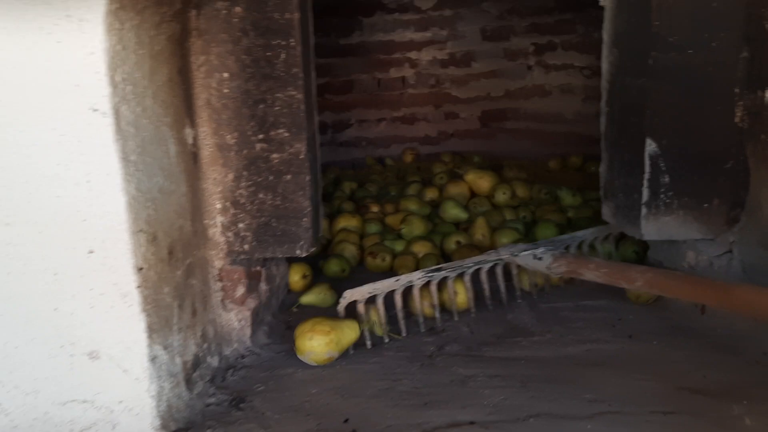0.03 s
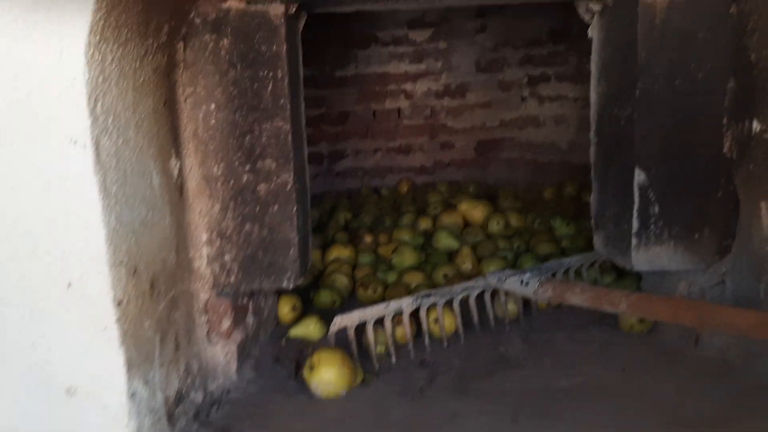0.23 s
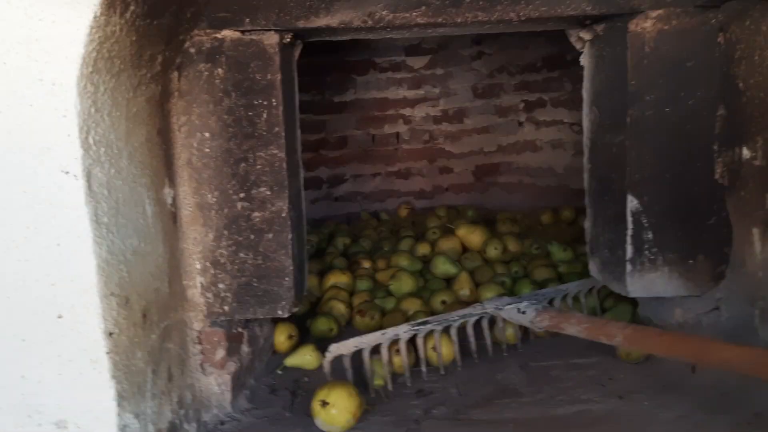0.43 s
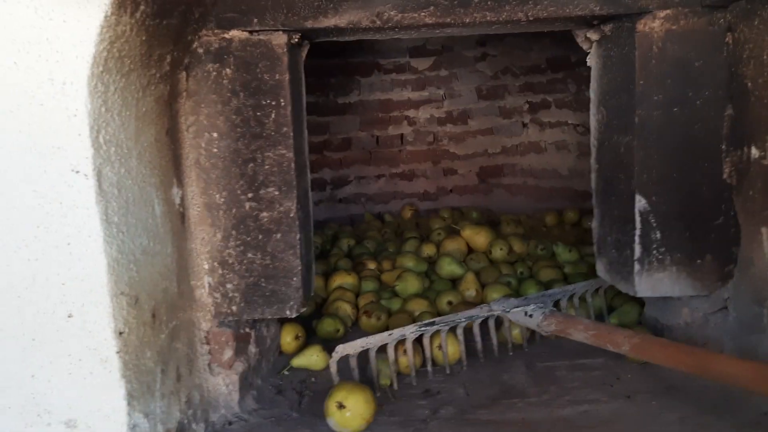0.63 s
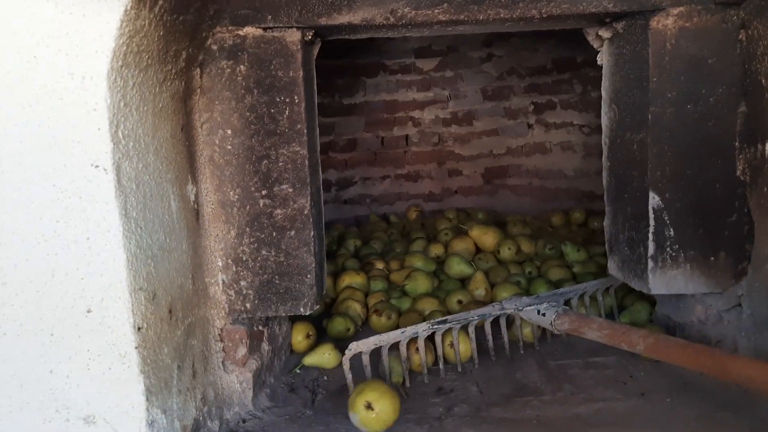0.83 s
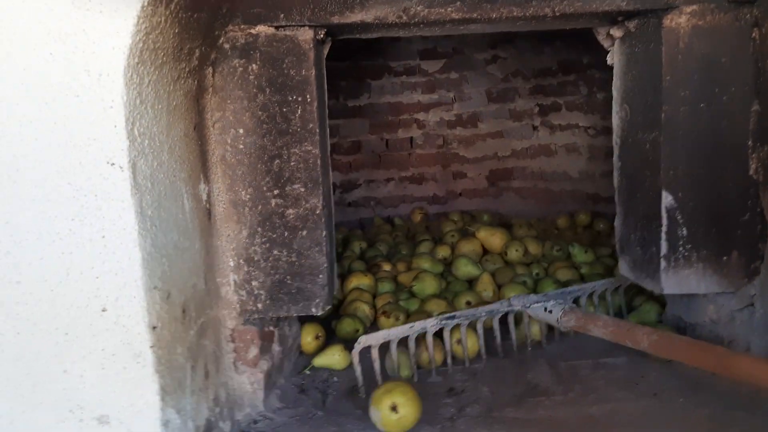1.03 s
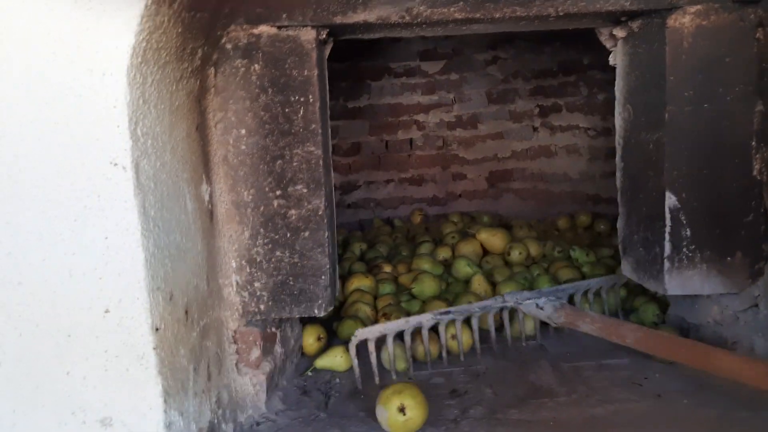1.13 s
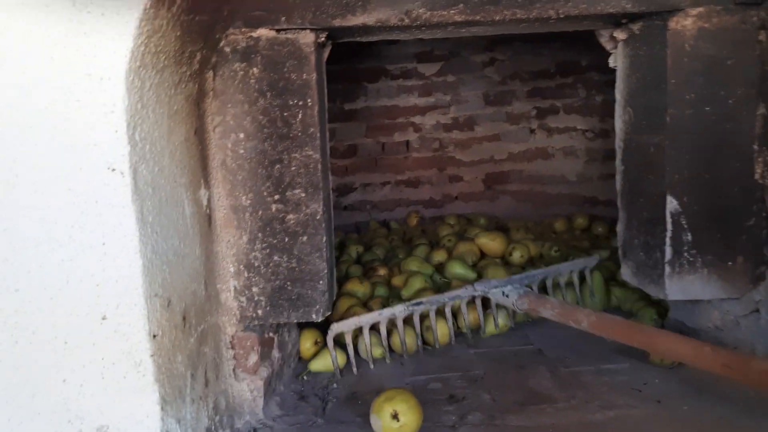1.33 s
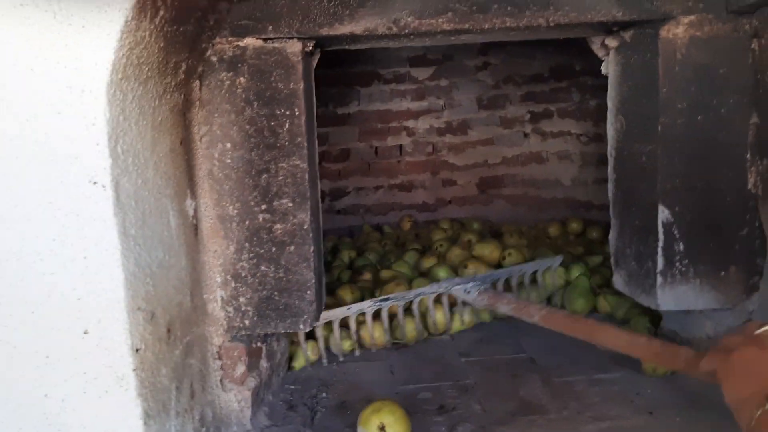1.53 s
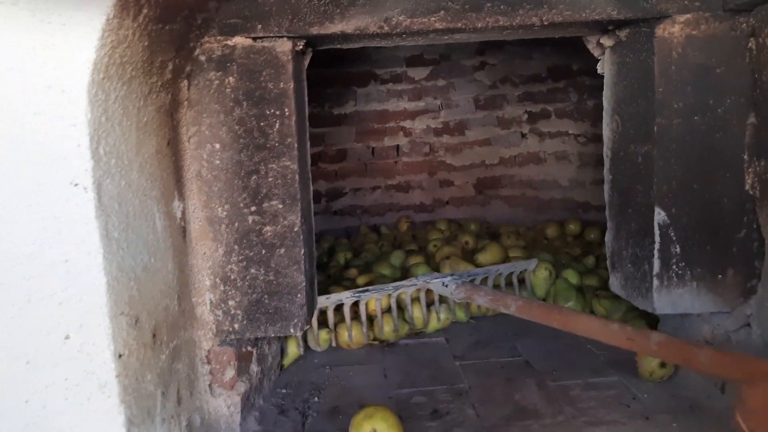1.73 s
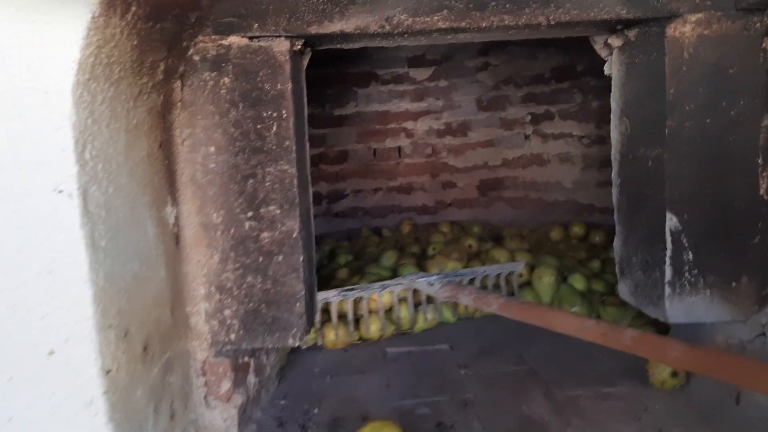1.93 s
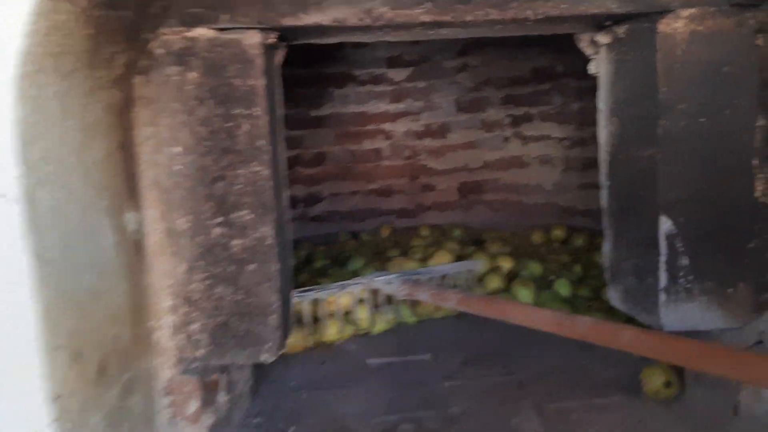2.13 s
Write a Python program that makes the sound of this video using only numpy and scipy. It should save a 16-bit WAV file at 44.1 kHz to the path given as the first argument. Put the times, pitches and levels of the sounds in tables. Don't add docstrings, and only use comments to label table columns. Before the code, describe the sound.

A metal rake scrapes a gritty brick oven floor, close in stereo with short hollow echo and faint air. From 0.07 to 0.3 s, light scrapes, soft pear bumps and bright grit snaps. It quiets until a rattling handle clack at 0.86 s. From 1.2 s a stronger push brings harsh catches, short steel rings and low pear thuds, peaking near 1.24 and 1.63 s, scraping on until an abrupt end at 2.16 s.

```python
import sys
import numpy as np
from scipy import signal
from scipy.fft import rfft, irfft, next_fast_len
from scipy.io import wavfile

SR = 44100
rng = np.random.default_rng(int(sys.argv[2]) if len(sys.argv) > 2 else 0)


def field_ratio(decibels):
    return 10 ** (np.asarray(decibels, dtype=float) / 20)


def master_out(mix):
    frames = np.transpose(np.atleast_2d(mix))
    ceiling = np.clip(frames, -1, 1)
    pcm = np.round(ceiling * 32767).astype(np.int16)
    wavfile.write(sys.argv[1], SR, pcm)


N = 95520


def rms_one(x):
    return x / np.sqrt(np.mean(x ** 2) + 1e-20)


def in_time(rows):
    s, *columns = np.transpose(rows)
    return [np.interp(np.arange(N) / SR, s, column) for column in columns]


def at_hz(points, hz):
    point_hz, value = np.array(points)[:, 0], np.array(points)[:, 1]
    return np.interp(np.log(hz), np.log(np.maximum(point_hz, 1)), value)


def bandpass(x, order, low_hz, high_hz):
    return signal.sosfilt(signal.butter(order, [low_hz, high_hz], "band", fs=SR, output="sos"), x)


def drift(rate):
    r = np.exp(-80 * np.pi * rate / SR)
    chance = rng.standard_normal(N // 40 + 2002)
    slow = signal.lfilter([1], [1, -2 * r, r * r], chance)[2000:]
    return np.interp(np.arange(N) / 40, np.arange(len(slow)), rms_one(slow))


def ring(x, hz, t60):
    r, w = field_ratio(-60 / (t60 * SR)), 2 * np.pi * hz / SR
    return signal.lfilter([0, np.sin(w)], [1, -2 * r * np.cos(w), r * r], x + 1e-18)


def grains(rate, spread_db):
    size = field_ratio(spread_db * np.minimum(rng.exponential(1, N), 4)) * rng.standard_normal(N)
    return rms_one(size * (rng.random(N) < rate / SR))


def fade(s, t60, attack=.0022):
    out, start = np.zeros(N), int(s * SR)
    t = np.arange(min(N - start, int(1.5 * t60 * SR))) / SR
    out[start:start + len(t)] = (1 - np.exp(-t / attack)) * field_ratio(-60 * t / t60)
    return out


# (pitch [Hz], left-right likeness [0 to 1])
PORT_LIKENESS = [(60, 0.81), (250, 0.84), (600, 0.58), (1500, 0.44), (5000, 0.058), (14000, 0.041)]


def coloured(spectrum, source, patchy_db, count=3):
    low, high = spectrum[0][0], min(spectrum[-1][0], 9500 if count == 6 else 16500)
    edges, out = np.geomspace(low, high, int(count * np.log2(high / low)) + 2), 0
    draws = [np.array([source(), source()]) for _ in range(2)]
    for k, (a, b) in enumerate(zip(edges, edges[1:])):
        middle_hz = np.sqrt(a * b)
        mid, side = bandpass(draws[k % 2], 2, a, b)
        alike = np.clip(at_hz(PORT_LIKENESS, middle_hz), 0, 1)
        gain = field_ratio(at_hz(spectrum, middle_hz) + patchy_db * drift(11))
        out = out + gain * (np.sqrt(1 + alike) * mid + np.sqrt(1 - alike) * side * [[1], [-1]])
    return rms_one(out)


# (pitch [Hz], level [dB])
AIR_COLOUR = [(250, -22), (400, -2), (950, -2), (2000, -4), (3900, -11), (7400, -13), (10500, -6),
              (13800, -6), (16000, -21)]


def open_air():
    return field_ratio(-61) * coloured(AIR_COLOUR, lambda: rng.standard_normal(N), patchy_db=4.0)


def oven(x):
    t60_s = .11
    size = next_fast_len(N + SR // 2)
    w = 2 * np.pi * np.arange(size // 2 + 1) / size
    lags = rng.uniform(.004, .022, (2, 14, 1)) * SR
    loop = field_ratio(-60 * lags / SR / t60_s) * np.exp(-1j * w * lags)
    loop = loop / (1 + 0.04 * w) * rng.choice([-1, 1], lags.shape)
    echoes = (loop / (1 - loop)).sum(1) / np.sqrt(14)
    return irfft(rfft(x, size) * echoes, size)[:, :N]


# (time [s], level [dB])
CLACK_BLOW = [
    (0.858, -22),
]
# (pitch [Hz], level [dB])
HANDLE_MODES = [(947, -11), (1200, -6), (1486, -4), (1868, -8), (2570, -3), (2826, -2), (4484, -4),
                (5981, -5)]


def clack():
    (s, db), = CLACK_BLOW
    blow = field_ratio(db) * (fade(s, .18, 0.0034) + fade(s, 0.017, 0.002))
    modes = 0
    for hz, mode_db in HANDLE_MODES:
        modes = modes + field_ratio(mode_db - 16) * ring(blow * grains(3000, spread_db=2.5), hz, t60=.033)
    crack = bandpass(blow * rng.standard_normal((2, N)), 3, 950, 6500)
    sizzle = 0.26 * blow * bandpass(2 * rng.standard_normal(N), 2, 6000, 12000)
    return 0.1 * modes, field_ratio(-8) * (crack + sizzle)


# (time [s], rumble level [dB])
ROLLING = [(.07, -45), (.12, -40.5), (.28, -51.5), (.4, -53.5), (.51, -62.5), (.55, -49), (.63, -56),
           (.74, -61), (.8, -51.5), (1.03, -50.5), (1.17, -49), (1.22, -36), (1.36, -42), (1.53, -46),
           (1.65, -35), (1.8, -50.5), (2.0, -46), (2.17, -46)]
# (pitch [Hz], level [dB])
RUMBLE_COLOUR = [(26, -34), (45, 3), (138, 4.5), (433, 0), (531, -4), (800, -39), (1040, -46), (1760, -120)]
# (pitch [Hz], level [dB])
HOLLOW_MODES = [(60, -3.5), (144, -6), (174, -22), (221, -3.5), (307, -9.5), (440, -14), (660, -11.5)]
# (time [s], peak level [dB], pitch [Hz])
PEAR_KNOCKS = [(0.1, -34, 370), (0.104, -41, 173), (0.14, -39, 151.4), (0.184, -30.5, 172),
               (0.231, -37, 168), (0.27, -38, 198), (0.372, -42.5, 518), (0.535, -41, 182),
               (0.563, -45, 176), (0.576, -38, 399), (0.782, -43, 282), (1.065, -33, 169), (1.07, -39, 347),
               (1.209, -29, 165), (1.211, -27, 398), (1.245, -24, 132), (1.252, -30, 460),
               (1.275, -30, 282), (1.306, -25.5, 171), (1.452, -32, 425), (1.556, -28.5, 137),
               (1.619, -27, 427), (1.633, -21.5, 141), (1.645, -25, 262), (1.666, -27, 142),
               (1.705, -32.5, 84), (1.96, -36, 92.5), (2.056, -38.5, 614), (2.099, -29.5, 122.5),
               (2.138, -29.5, 139)]


def pears():
    hollow_t60_s = .2
    roll_db, = in_time(ROLLING)
    bumps = lambda: grains(90, spread_db=-6.0) + 0.81 * rng.standard_normal(N)
    knocks = np.zeros(N)
    for s, db, hz in PEAR_KNOCKS:
        t = np.maximum(np.arange(N) / SR - s, 0)
        t60_s = 4.9 / hz + 0.096
        knocks += field_ratio(db - 4.5) * fade(s, t60_s, 0.003) * np.sin(2 * np.pi * hz * t)
    hollow = 0
    for hz, db in HOLLOW_MODES:
        level = field_ratio(db - 4) * np.sqrt(7 / hollow_t60_s / SR)
        hollow = hollow + level * ring(field_ratio(roll_db) * bumps(), hz, hollow_t60_s)
    return field_ratio(roll_db - 3.5) * coloured(RUMBLE_COLOUR, bumps, patchy_db=2.5) + hollow, knocks


# (time [s], peak level [dB], fade by 60 dB [s])
GRIT_CHIPS = [
    (0.1023, -33.5, 0.024),
    (0.113, -37.5, 0.037),
    (0.1673, -32, 0.022),
    (0.189, -21, 0.024),
    (0.2525, -32, 0.022),
    (0.2674, -31.5, 0.026),
]
CHIP_MODES = [12730, 12100, 12870, 13400]
# (time [s], peak level [dB])
DRY_SNAPS = [
    (0.8724, -43),
    (1.504, -31),
    (1.708, -33),
    (1.7383, -35),
    (1.8075, -31),
]


def chips():
    burst = sum(field_ratio(db) * fade(s, max(t60, .004), .0002) for s, db, t60 in GRIT_CHIPS)
    clicks = np.zeros(N)
    for s, db in DRY_SNAPS:
        clicks[int(s * SR)] = 4 * field_ratio(db)
    snaps = bandpass(clicks + 1e-18, 2, 10800, 13600)
    return snaps + sum(0.051 * ring(burst * rng.standard_normal(N), hz, 0.0099) for hz in CHIP_MODES)


# (time [s], peak level [dB], pitch [Hz], fade by 60 dB [s])
TINE_RINGS = [(.072, -48, 1776, 0.37), (.071, -46, 3570, 0.046), (.075, -44.5, 600, 0.11),
              (.101, -41, 4480, 0.089), (.101, -47, 3590, .09), (.104, -66, 6000, 0.11),
              (.12, -55, 2860, 0.076), (.1, -39, 900, 0.034), (.19, -42, 6140, 0.032),
              (.197, -50.5, 857, 0.27), (.2, -45, 5830, 0.11), (.19, -51, 2860, 0.18),
              (.258, -49, 5750, 0.099), (.262, -42, 4780, 0.044), (.263, -43.5, 3330, 0.085),
              (1.196, -34, 4240, .05), (1.215, -28.5, 4360, 0.049), (1.212, -38.5, 1777, 0.11),
              (1.238, -33, 2075, 0.088), (1.243, -30, 5705, 0.12), (1.238, -25, 6200, 0.037),
              (1.241, -27, 4290, .06), (1.245, -29.5, 3260, .08), (1.245, -37, 2810, 0.13),
              (1.266, -24.5, 4370, .06), (1.268, -29.5, 3350, 0.039), (1.275, -41, 1744, 0.18),
              (1.281, -39.5, 901, 0.1), (1.3, -42, 3630, 0.28), (1.326, -36.5, 4560, 0.1),
              (1.347, -43.5, 1800, 0.24), (1.387, -34.5, 4360, 0.13), (1.389, -41, 1830, 0.036),
              (1.391, -40, 2845, 0.17), (1.393, -32.5, 4960, 0.067), (1.443, -40.5, 3160, 0.097),
              (1.45, -47.5, 1430, 0.13), (1.535, -38, 3290, 0.13), (1.535, -33, 6740, 0.032),
              (1.535, -28.5, 4420, 0.033), (1.548, -41, 2515, 0.1), (1.607, -40, 6100, 0.054),
              (1.63, -33.5, 5440, 0.15), (1.644, -21.5, 4250, 0.062), (1.949, -21.5, 4314, 0.023),
              (1.992, -41, 1496, .07), (2.121, -35, 3263, 0.049), (2.12, -44, 2023, 0.06)]
# (time [s], peak level [dB], pitch [Hz], fade by 60 dB [s])
CLEAR_HANDLE_RINGS = [
    (0.859, -40.5, 1483, 0.14),
    (.859, -45, 2524, 0.057),
    (.864, -39, 6120, 0.041),
    (.865, -42, 4560, 0.096),
    (.895, -51, 2910, .05),
    (.915, -48, 1480, 0.12),
    (0.948, -44.5, 2160, 0.063),
    (.949, -43.5, 1490, 0.048),
    (.949, -46, 4380, .04),
    (0.971, -49, 1865, 0.079),
]


def clear_rings():
    t, out = np.arange(N) / SR, np.zeros(N)
    rows = TINE_RINGS + CLEAR_HANDLE_RINGS
    for (s, db, hz, t60), (phase, beat) in zip(rows, rng.random((len(rows), 2))):
        tone = np.sin(2 * np.pi * (hz * t + phase))
        neighbour = .25 * np.sin(2 * np.pi * (hz + 40 + 50 * beat) * t)
        out += field_ratio(db + 5.5) * fade(s, max(t60, .02), attack=.0012) * (tone + neighbour)
    return out


# (time [s], scraping level [dB], grit hiss level [dB])
RAKE_PUSH = [(.07, -49, -73), (.14, -59, -63), (.29, -55.5, -65), (.42, -78, -70), (.57, -63, -67),
             (.75, -76, -63.5), (.8, -57.5, -62.5), (1.03, -57.5, -59.5), (1.16, -56.5, -56),
             (1.2, -43, -54), (1.35, -42, -50.5), (1.48, -49, -46.5), (1.59, -46, -45.5),
             (1.63, -39.5, -45), (1.72, -51, -48), (1.9, -48, -47.5), (2.05, -45.5, -47.5),
             (2.17, -46.5, -50.5)]
# (time [s], peak level [dB], top end against the body [dB], fade by 60 dB [s])
TINE_CATCHES = [(0.066, -29.5, -6, 0.11), (0.1015, -31, -26, 0.31), (0.168, -34.5, -16, 0.29),
                (0.191, -44, 2, 0.16), (0.2524, -37, 2, 0.17), (0.267, -40, -2, 0.06),
                (0.3556, -41, -18, 0.3), (0.7803, -35, -26, 0.13), (0.9495, -37, -19, 0.041),
                (1.062, -36.5, 6, 0.31), (1.1953, -31, 8, 0.18), (1.2148, -27.5, 13.5, 0.18),
                (1.237, -19, 12.5, 0.25), (1.262, -37, 13, 0.32), (1.388, -29, 2, 0.25),
                (1.4434, -29.5, -8, 0.34), (1.5343, -25, 15.5, 0.12), (1.6062, -20.5, -8, 0.12),
                (1.6273, -23.5, -11, 0.24), (1.6445, -27.5, 22, 0.098), (1.946, -34, 15.5, 0.13),
                (2.1182, -32, 10, 0.1)]
# (pitch [Hz], level [dB per Hz])
BRICK_COLOUR = [(290, -39), (500, -7), (2040, -2), (3900, -7.5), (4230, -4), (8000, -20), (10400, -10),
                (17600, -120)]
# (pitch [Hz], level [dB])
GRIT_COLOUR = [(4120, -7), (7000, -5), (8810, 1.5), (11200, -1.5), (12200, 1), (14400, -2), (15900, -22)]
# (pitch [Hz], width [Hz], level [dB])
TINE_MODES = [(1755, 70, -7), (2080, 50, -9), (2850, 60, -9), (3260, 60, -8), (3683, 50, -10),
              (4600, 90, -8), (5540, 60, -11), (5680, 50, -9), (5930, 50, -10)]


def bite(s, t60):
    return fade(s, max(t60, .02)) + 0.36 * fade(s, 0.02, 0.00047)


def rake():
    scrape_db, hiss_db = in_time(RAKE_PUSH)
    catches = np.array([field_ratio(db - 14) * bite(s, t60) for s, db, _, t60 in TINE_CATCHES])
    bright = sum(field_ratio(db + top_db - 19) * bite(s, 0.54 * t60) for s, db, top_db, t60 in TINE_CATCHES)
    slips = lambda: grains(5000, spread_db=1.5) + .5 * rng.standard_normal(N)
    brick = (field_ratio(scrape_db) + catches.sum(0)) * coloured(BRICK_COLOUR, slips, patchy_db=2.0, count=6)
    grit = (field_ratio(hiss_db) + bright) * coloured(GRIT_COLOUR, slips, patchy_db=2.2, count=9)
    strengths = field_ratio(2.5 * rng.standard_normal((len(TINE_CATCHES), len(TINE_MODES))))
    tines = 0
    for k, (hz, width, db) in enumerate(TINE_MODES):
        width = max(width, 50)
        drag = field_ratio(scrape_db - 5 + 4 * drift(15))
        drive = (drag + strengths[:, k] @ catches) * grains(700, spread_db=2.5)
        tines = tines + field_ratio(db - 4) * np.sqrt(width / SR) * ring(drive, hz, 3 / width)
    return brick + grit, tines


def scene():
    air = open_air()
    handle, crack = clack()
    rumble, knocks = pears()
    scrape, tines = rake()
    struck = tines + chips() + handle
    rings = clear_rings()
    near = rings * field_ratio(np.array([[0], [-13]]))
    echo = field_ratio(-5) * oven(struck + 0.9 * knocks + .45 * rings)
    return scrape + rumble + air + crack + knocks + struck + near + echo


def roll_off(x):
    return signal.sosfilt(signal.butter(12, 16190, fs=SR, output="sos"), x)


# (pitch [Hz], left over right [dB])
PORT_LEAN = [(60, 1), (150, 1), (380, -2.5), (950, 6), (2380, -0.5), (5000, -1.5), (15000, 11.5)]


def record(dry):
    lag_s, start_s, end_s, top_hz, low_cut_hz = .00011, .0697, 2.1645, 15850, 58
    hz = np.arange(N // 2 + 1) * SR / N
    lean = field_ratio(at_hz(PORT_LEAN, hz + 1) / 2 * np.array([[1], [-1]]))
    lag = np.exp(-2j * np.pi * hz * lag_s * np.array([[1], [0]]))
    t = np.arange(N) / SR
    x = irfft(rfft(dry) * lean * lag * (hz < top_hz), N) * (t > start_s) * (t < end_s)
    x = signal.sosfilt(signal.butter(4, low_cut_hz, "high", fs=SR, output="sos"), x)
    return roll_off(x)


dry = scene()
out = record(dry)
master_out(out)
```